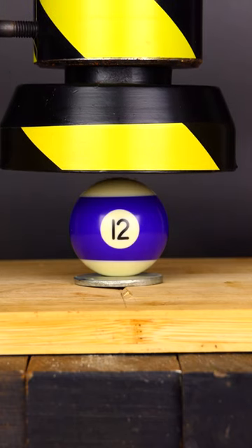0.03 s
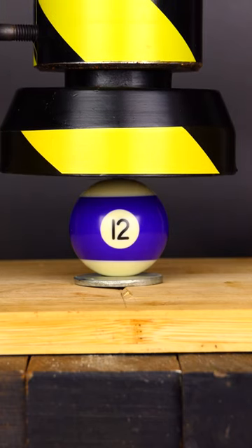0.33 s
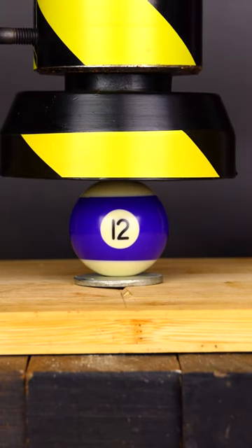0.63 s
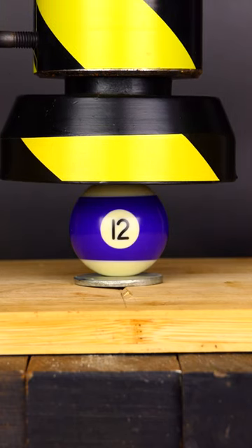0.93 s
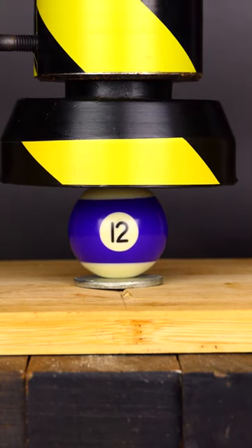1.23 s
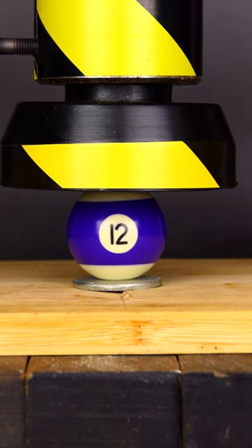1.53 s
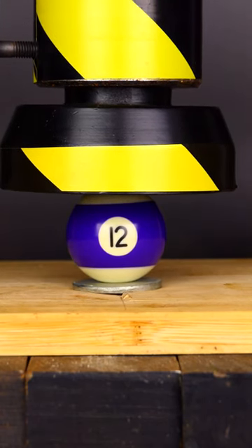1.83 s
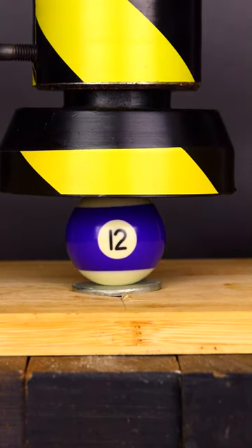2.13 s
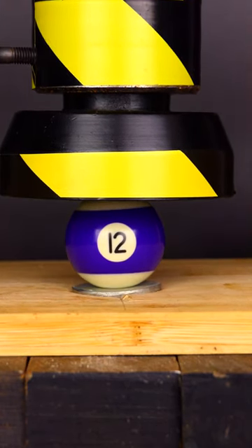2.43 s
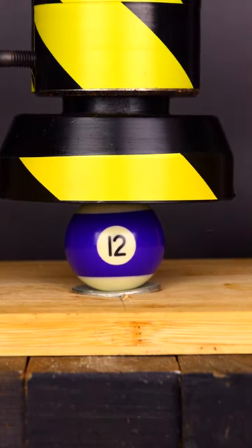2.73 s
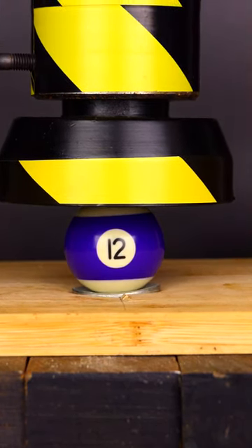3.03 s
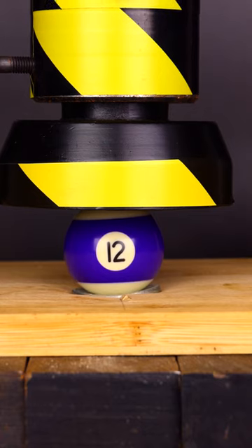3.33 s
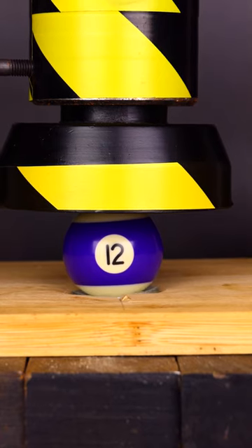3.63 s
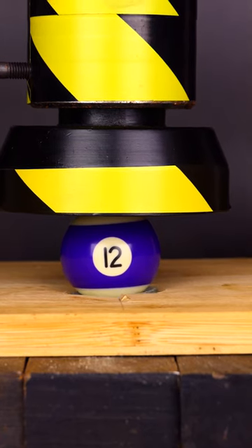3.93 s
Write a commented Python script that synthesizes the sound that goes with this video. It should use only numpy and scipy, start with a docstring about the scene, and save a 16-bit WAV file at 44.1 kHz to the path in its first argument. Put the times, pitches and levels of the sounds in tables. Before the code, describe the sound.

A hydraulic press hums and buzzes throughout, left of centre in a small workshop, its high whine strengthening in the second half. At about 1.5 seconds a wooden board splits with a dull knock. Small sharp snaps follow, with the loudest crack near 2.7 seconds, after which the level briefly dips. Wood fibres keep snapping and crackling, growing denser from about 3.4 seconds until the end at 4.

```python
"""A hydraulic pump hums and buzzes on multiples of its shaft speed, whining harder as the load builds.
The press is pushing a billiard ball and a steel washer into a wooden board in a small workshop.
The board splits with a dull knock, then its fibres snap and crackle as they are crushed.
It all sits to the left; the microphone's gain control ducks after the loudest cracks."""
import sys
import numpy as np
from scipy import signal
from scipy.fft import rfft, irfft
from scipy.io import wavfile

SR = 44100
rng = np.random.default_rng(int(sys.argv[2]) if len(sys.argv) > 2 else 0)


def transcribe(signal):
    """Save signal, clipped to [-1, 1], as a 16-bit WAV file at the path in sys.argv[1]."""
    frames = np.atleast_2d(signal).T
    limited = np.clip(frames, -1, 1)
    pcm = np.round(limited * 32767).astype(np.int16)
    wavfile.write(sys.argv[1], SR, pcm)


N = 176400
TIME = np.arange(N) / SR
SPLINTERS_PER_S, TOP_CUT_HZ = 5000, 16100

# pump shaft, sagging slightly: (time [s], speed [turns/s])
SHAFT_SPEED = [(0, 24.935), (1.4, 24.925), (2.2, 24.905), (3.05, 24.872), (3.75, 24.826), (4, 24.82)]
# low pump tones, by shaft multiple: (unloaded level [dB], full-load level [dB])
HUM_TONES = {2: (-54.5, -54), 3: (-37, -35), 4: (-53.5, -48.5), 5: (-37.5, -42), 6: (-42.5, -38.5),
             7: (-45.5, -42), 8: (-47.5, -48), 9: (-50.5, -47.5), 10: (-52.5, -96), 11: (-48, -44.5),
             14: (-47, -56.5), 15: (-48.5, -54), 16: (-54.5, -46), 17: (-53.5, -47.5), 18: (-49.5, -47.5),
             28: (-45, -42), 29: (-61, -61), 32: (-52.5, -46), 35: (-34.5, -35), 36: (-43.5, -41.5),
             23: (-60, -57.5), 26: (-56, -59), 33: (-68, -45.5), 46: (-56.5, -51), 48: (-56, -52.5),
             50: (-57, -51.5)}
# high pump tones, by shaft multiple: (unloaded level [dB], half-load level [dB], full-load level [dB])
WHINE_TONES = {70: (-55.5, -62, -55.5), 95: (-54.5, -58, -55), 96: (-51, -49.5, -59.5),
               108: (-40.5, -41, -46.5), 120: (-48, -43, -45), 132: (-72, -46.5, -44.5),
               138: (-56.5, -43, -68), 144: (-54, -40, -40), 156: (-49.5, -40, -26.5), 158: (-57, -50, -43),
               168: (-67, -83, -36.5), 170: (-53.5, -72, -43), 174: (-58, -73, -48), 176: (-46, -53, -53),
               180: (-52.5, -69, -50)}


def from_db(db):
    """Decibels to gain."""
    return 10 ** (np.asarray(db) / 20)


def unit_rms(x):
    """Scale to unit level."""
    return x / np.sqrt(np.mean(x ** 2) + 1e-20)


def in_time(rows):
    """Each column of an automation curve, sample by sample."""
    times, *columns = np.transpose(rows)
    return [np.interp(TIME, times, c) for c in columns]


def at_hz(points, hz):
    """Each column of a spectrum at the given frequencies."""
    freqs, *columns = np.transpose(points)
    return [np.interp(np.log(np.maximum(hz, 1)), np.log(freqs), c) for c in columns]


def colour(x, spectrum):
    """EQ a steady sound; unit level."""
    hz = np.arange(N // 2 + 1) * SR / N
    return unit_rms(irfft(rfft(x) * from_db(at_hz(spectrum, hz)[0]), N))


def band(x, low_hz, high_hz, order=2):
    """Causal band-pass."""
    return signal.sosfilt(signal.butter(order, [low_hz, high_hz], "band", fs=SR, output="sos"), x + 1e-18)


def drift(rate_hz):
    """Smooth random wander with a spread of 1."""
    hop, settle = 100, 1000
    pole = np.exp(-2 * np.pi * rate_hz * hop / SR)
    noise = rng.standard_normal(N // hop + settle + 2)
    slow = signal.lfilter([1], [1, -2 * pole, pole * pole], noise)[settle:]
    return np.interp(np.arange(N) / hop, np.arange(len(slow)), unit_rms(slow))


def grains(per_s, spread_db, size):
    """Random clicks of uneven strength; unit level."""
    strength = from_db(spread_db * np.minimum(rng.exponential(1, size), 4))
    return unit_rms(strength * rng.choice([-1, 1], size) * (rng.random(size) < per_s / SR))


def add(track, start_s, sound):
    """Mix a sound in at a time."""
    i = int(start_s * SR)
    track[i:i + len(sound)] += sound[:N - i]


def workshop(x, t60_s=0.46, build_s=0.002, wall_cut_hz=8900):
    """Dense reflections that build quickly and die away, dulled by the walls."""
    t = TIME[:SR]
    tail = rng.standard_normal(SR) * from_db(-60 * t / t60_s) * (1 - np.exp(-t / build_s))
    pole = np.exp(-2 * np.pi * wall_cut_hz / SR)
    dull_tail = signal.lfilter([1 - pole], [1, -pole], tail / np.linalg.norm(tail))
    return signal.fftconvolve(x, dull_tail)[:N]


def pump_tones(turns, load, hum_scatter_rad=1.71):
    """Gear mesh, hum and whine lock to the shaft; the load shifts the balance of hum and whine."""
    # gears meshing 12 times a turn: (time [s], level [dB])
    mesh = [(0, -30.5), (.45, -34), (1.2, -28.5), (1.5, -33), (1.9, -28.5), (2.5, -33.5), (2.95, -32.5),
            (3.35, -29.5), (3.65, -32), (3.85, -30), (4, -30.5)]
    # the octave above the mesh tone: (time [s], level [dB])
    mesh_octave = [(0, -48.5), (.3, -42.5), (.55, -45.5), (1.5, -40), (1.8, -50), (2.6, -55), (4, -51)]

    def tone(multiple, db, scatter_rad):
        phase = 2 * np.pi * multiple * turns + scatter_rad * rng.standard_normal()
        return np.sqrt(2) * from_db(db) * np.cos(phase)

    def stack(tones, waver_db, scatter_rad):
        for multiple, levels_db in tones.items():
            db = np.interp(load, np.linspace(0, 1, len(levels_db)), levels_db)
            yield tone(multiple, db + waver_db * drift(rate_hz=0.76), scatter_rad)

    gears = tone(12, in_time(mesh)[0], hum_scatter_rad)
    gears += tone(24, in_time(mesh_octave)[0], hum_scatter_rad)
    hum = sum(stack(HUM_TONES, waver_db=0.87, scatter_rad=hum_scatter_rad))
    whine = sum(stack(WHINE_TONES, waver_db=1.5, scatter_rad=1))
    return gears + hum + whine


def each_turn(cycle, turns):
    """Loop one cycle in step with the shaft."""
    return np.interp(turns % 1, np.arange(len(cycle)) / len(cycle), cycle)


def housing_buzz(turns, load, uneven_db=3, size=8192):
    """The same rough rattle of the housing comes round every turn, changing colour with the load."""
    # buzz per partial: (frequency [Hz], unloaded level [dB], full-load level [dB])
    buzz_spectrum = [(318, -58, -52), (483, -68, -58.5), (674, -55.5, -59.5), (1077, -90.5, -70),
                     (1144, -58.5, -56), (1343, -71, -62.5), (1656, -68.5, -75.5), (2430, -78, -72),
                     (2810, -61, -77), (3310, -58.5, -61), (3780, -66.5, -51), (3990, -62, -53),
                     (4800, -69.5, -70), (5850, -78.5, -83), (12000, -99, -75)]
    multiples = np.arange(size // 2 + 1)
    hz = multiples * SHAFT_SPEED[0][1]
    tonal = np.isin(multiples, [24, *HUM_TONES, *WHINE_TONES])
    between_tones = (multiples > 12) & (hz < TOP_CUT_HZ) & ~tonal

    def rattle(db):
        gains = between_tones * from_db(db + uneven_db * rng.standard_normal(len(hz)))
        partials = gains * np.exp(2j * np.pi * rng.random(len(hz)))
        return each_turn(irfft(partials) * size / np.sqrt(2), turns)

    unloaded, loaded = [rattle(db) for db in at_hz(buzz_spectrum, hz)]
    return np.sqrt(1 - load) * unloaded + np.sqrt(load) * loaded


def valve_tick(turns, load, hz=4246, width_hz=280, decay_s=0.0014, size=8192):
    """A valve ticks once a turn, fading under load."""
    unloaded_db, load_change_db = -47, -9
    t = np.arange(size) / size / SHAFT_SPEED[0][1]
    burst = rng.standard_normal(size) * np.exp(-t / decay_s)
    ticks = band(each_turn(burst, turns), hz - width_hz / 2, hz + width_hz / 2)
    return unit_rms(ticks) * from_db(unloaded_db + load_change_db * load)


def oil_flow(load, unloaded_db=-42.5, load_change_db=2.5):
    """A smooth bed of oil rush and motor noise swells a little with the load."""
    # colour of the rush: (frequency [Hz], relative level [dB])
    flow_spectrum = [(30, -8), (70, 8), (150, 5), (400, 0), (750, 2.5), (1050, -1.5), (2000, -9),
                     (2800, 0.5), (3600, -13), (4300, -7), (5500, -32), (7300, -16.5), (9500, -12.5),
                     (10800, -20), (12300, -9.5), (15500, -39)]
    return colour(rng.standard_normal(N), flow_spectrum) * from_db(unloaded_db + load_change_db * load)


def board_split(knock_s=1.5488, knock_db=-10, room_db=-6.5):
    """The board gives way with a ringing knock, and in dense tears, each in a band of its own."""
    # wood tearing: (time [s], level [dB], low edge [Hz], high edge [Hz], rise [s], decay [s])
    tears = [(.895, -41, 2000, 7000, .006, .012), (1.549, -20, 132, 870, 0.0019, 0.036),
             (1.548, -21.5, 900, 3300, .0003, 0.013), (1.5496, -31, 3480, 7150, 0.00033, 0.0033),
             (1.557, -20, 434, 654, 0.0013, 0.0099), (1.566, -25, 865, 1330, 0.0008, .016),
             (1.595, -27, 1440, 2580, 0.0067, 0.026), (1.615, -25, 1950, 4600, 0.013, 0.014),
             (1.597, -41.5, 6000, 15000, .012, 0.027), (2.7235, -28, 760, 3200, 0.00033, 0.0079),
             (2.725, -21.5, 2400, 6050, 0.00088, 0.018), (3.039, -25, 2620, 6040, 0.0018, 0.017),
             (3.791, -31, 330, 606, .005, .022)]
    # ring of the board: (frequency [Hz], level relative to the knock [dB], decay [s])
    board_modes = [(234, -7.5, 0.013), (400, -1, 0.0058), (558, 0.5, 0.01), (715, -4.5, 0.011),
                   (1190, -3, 0.0039), (1820, -1, .005), (2410, -5, 0.0029), (3320, -11, 0.0025)]
    wood, t = np.zeros(N), TIME[:SR // 4]
    for start_s, db, low_hz, high_hz, rise_s, decay_s in tears:
        envelope = (1 - np.exp(-t / rise_s)) * np.exp(-t / decay_s)
        splinters = grains(SPLINTERS_PER_S, spread_db=1.2, size=len(t))
        tear = band(splinters * envelope, low_hz, high_hz, order=3)
        tear *= np.sqrt(decay_s * SR / 2 / np.sum(tear ** 2))  # same energy whatever the bandwidth
        add(wood, start_s, from_db(db) * tear)
    for k, (hz, db, decay_s) in enumerate(board_modes):
        ring = np.sin(2 * np.pi * hz * t) * np.exp(-t / decay_s)
        add(wood, knock_s, (-1) ** k * from_db(knock_db + db) * ring)
    return wood + from_db(room_db) * workshop(wood)


def fibre_snaps(top_hz=12700, room_db=-6):
    """Each snap is one sharp click and a dying shower of splinters, some bright, some deeper."""
    # fibres breaking: (time [s], relative click [dB], relative splinters [dB], low edge [Hz], decay [s])
    breaks = [(1.8141, -7.5, -31.5, 5100, 0.0077), (1.872, -26, -35.5, 5470, 0.019),
              (1.946, -20, -35, 6000, .003), (1.997, -18, -30.5, 6000, 0.004),
              (2.045, -22, -33.5, 6000, 0.011), (2.178, -24, -30, 5530, 0.0043),
              (2.254, -19, -24.5, 5630, 0.0072), (2.4479, -6.5, -26, 3450, 0.0042),
              (2.5267, 2, -17, 7960, 0.0046), (2.6685, -0.5, -23.5, 5760, 0.005),
              (2.7236, 10, -8, 2900, 0.0065), (3.0377, -15, -16, 1730, 0.0025),
              (3.099, -22, -52, 6050, .003), (3.2, -25, -31, 6000, 0.0039),
              (3.2077, -15, -31, 7060, 0.0023), (3.236, -24, -32, 4500, 0.011),
              (3.358, -25, -34.5, 2000, .006), (3.442, -23, -35.5, 2000, 0.0088),
              (3.544, -21, -30, 3000, 0.0063), (3.595, -24, -36, 3000, .012),
              (3.645, -35, -34.5, 3000, 0.014), (3.747, -24, -30.5, 3470, 0.0047),
              (3.793, -17, -27.5, 3500, .008), (3.8158, -6.5, -20, 3980, 0.0036),
              (3.824, -27, -27, 4500, .005), (3.8853, -12, -25.5, 3500, 0.0039),
              (3.916, -21, -29, 3500, 0.0062)]
    snaps, t = np.zeros(N), TIME[:SR // 8]
    for start_s, click_db, splinter_db, low_hz, decay_s in breaks:
        splinters = grains(SPLINTERS_PER_S, spread_db=5.5, size=len(t))
        snap = from_db(splinter_db) * splinters * np.exp(-t / decay_s)
        snap[0] = from_db(click_db)
        add(snaps, start_s, 2 * band(snap, low_hz, top_hz))
    return snaps + from_db(room_db) * workshop(snaps)


def crushing(clump_db=2.5, thick_db=-9.5):
    """Countless small fibres fail in clumps under the washer; now and then a thicker one ticks."""
    # swells of the crushing: (time [s], crackle level [dB], crunch level [dB])
    swells = [(0, -80, -80), (1.75, -66, -51), (2.08, -45, -42), (2.2, -48, -46), (2.3, -38.5, -40),
              (2.4, -49.5, -46), (2.62, -47, -44.5), (2.8, -94, -41), (3.0, -46, -54), (3.3, -48, -47),
              (3.4, -38, -37), (3.51, -46, -41.5), (3.62, -37, -39), (3.77, -49, -43), (3.82, -40, -34.5),
              (3.87, -41, -35.5), (3.96, -33.5, -33), (4, -34, -34)]
    # fine, bright crackle: (frequency [Hz], relative level [dB])
    crackle_spectrum = [(2000, -25), (4500, -5), (7000, -9), (9700, 1), (11000, -4), (13000, 4.5),
                        (15500, -13)]
    # deeper crunch: (frequency [Hz], relative level [dB])
    crunch_spectrum = [(120, -31), (400, -22), (900, -1.5), (1600, 2.5), (2400, 4.5), (4000, 0), (7000, -4),
                       (14000, -33)]
    layers = np.zeros(N)
    for db, spectrum in zip(in_time(swells), (crackle_spectrum, crunch_spectrum)):
        fine = grains(per_s=5200, spread_db=2, size=N) * from_db(clump_db * drift(rate_hz=32))
        thick = from_db(thick_db) * grains(per_s=160, spread_db=5, size=N)
        layers += from_db(db) * colour(fine + thick, spectrum)
    return layers


def scene(first_stroke_s=0.026, ripple_turns=0.00076, left_over_right_db=9.5):
    """Pump and breaking wood, panned together to the left."""
    # load on the ram: (time [s], share of full load [0-1])
    ram_load = [(0, 0.01), (1.55, 0), (1.9, 0.24), (2.25, 0.48), (2.7, 0.73), (3.05, 0.9), (3.6, 0.98),
                (4, 0.95)]
    speed, load = in_time(SHAFT_SPEED)[0], in_time(ram_load)[0]
    turns = np.cumsum(speed) / SR - first_stroke_s * speed[0]
    turns += ripple_turns * np.sin(2 * np.pi * turns)  # the shaft leads and lags once a turn
    pump = pump_tones(turns, load) + housing_buzz(turns, load) + valve_tick(turns, load) + oil_flow(load)
    wood = board_split() + fibre_snaps() + crushing()
    pan = np.array([[from_db(left_over_right_db)], [1]])
    return (pump + wood) * pan / pan.mean()


def record(dry):
    """Gain control ducks after loud cracks, peaks clip, the top is cut."""
    threshold_db, sense_s, attack_s, release_db_per_s = -13.5, 0.0033, 0.0018, 27.5

    def smooth(x, lag_s):
        pole = np.exp(-1 / (lag_s * SR))
        return signal.lfilter([1 - pole], [1, -pole], x)

    level_db = 10 * np.log10(smooth(dry.mean(axis=0) ** 2, sense_s) + 1e-12)
    over_db = np.maximum(level_db - threshold_db, 0)
    release_db = release_db_per_s * TIME
    duck_db = smooth(np.maximum.accumulate(over_db + release_db) - release_db, attack_s)
    clipped = np.clip(dry * from_db(-duck_db), -1, 1)
    return signal.sosfilt(signal.ellip(10, .1, 80, TOP_CUT_HZ, fs=SR, output="sos"), clipped)


dry = scene()
out = record(dry)
transcribe(out)
```